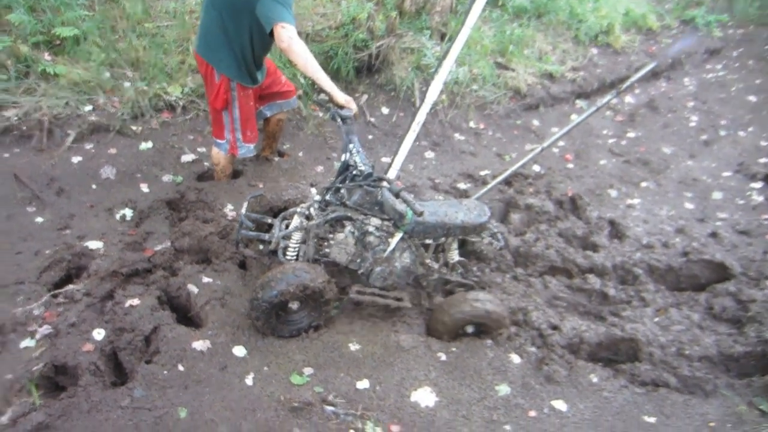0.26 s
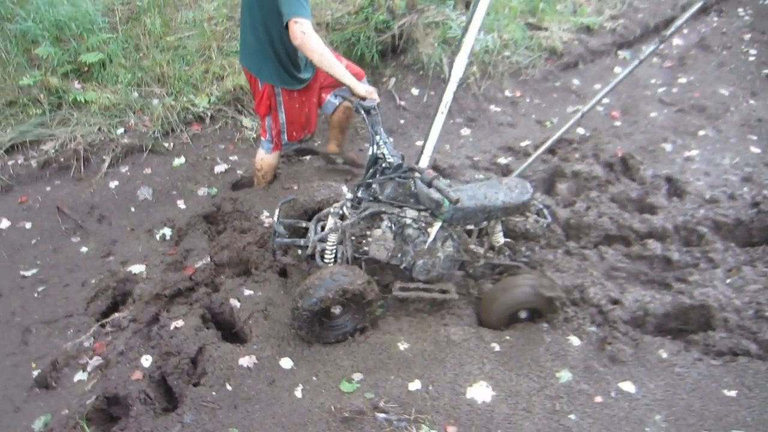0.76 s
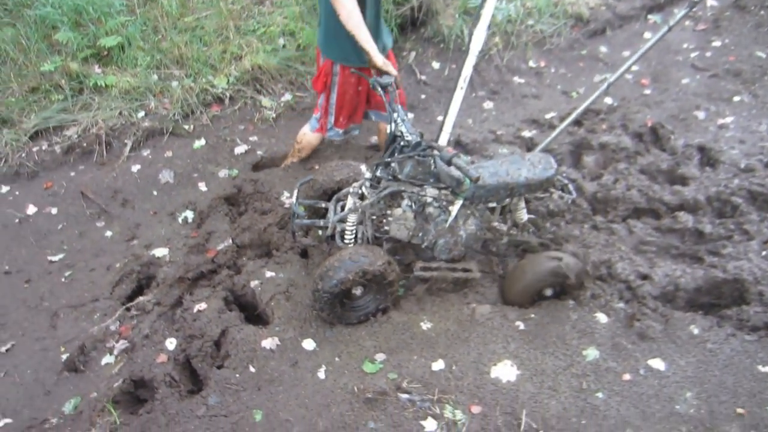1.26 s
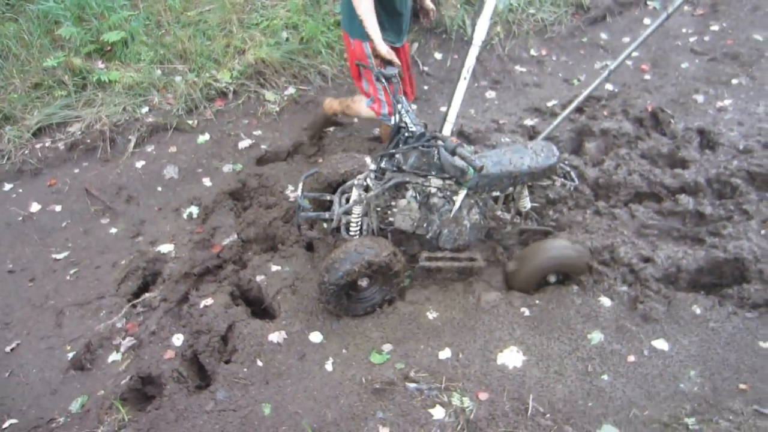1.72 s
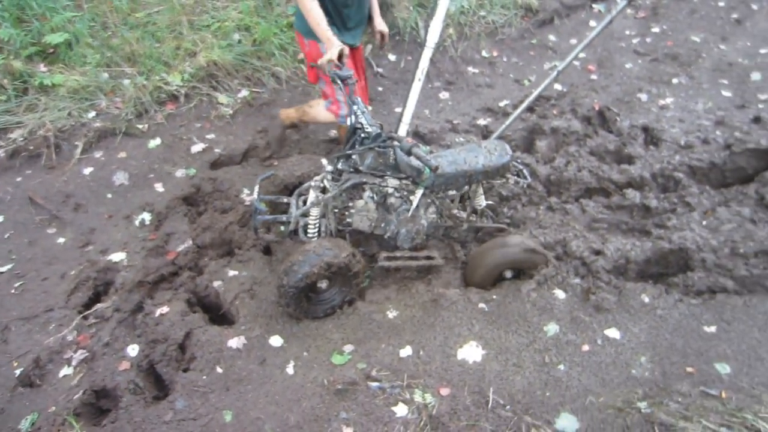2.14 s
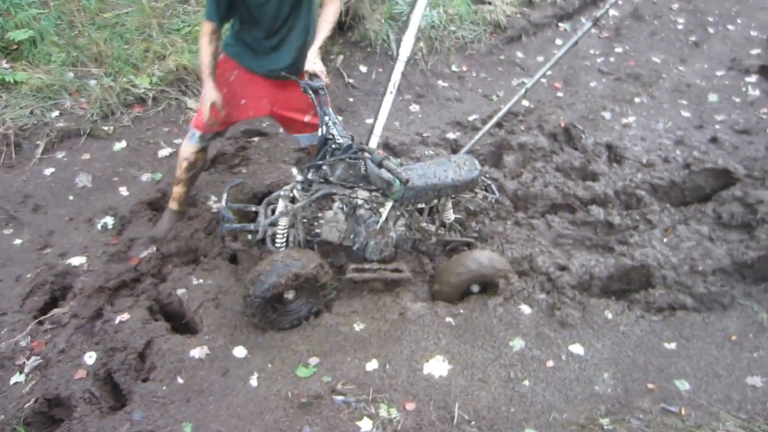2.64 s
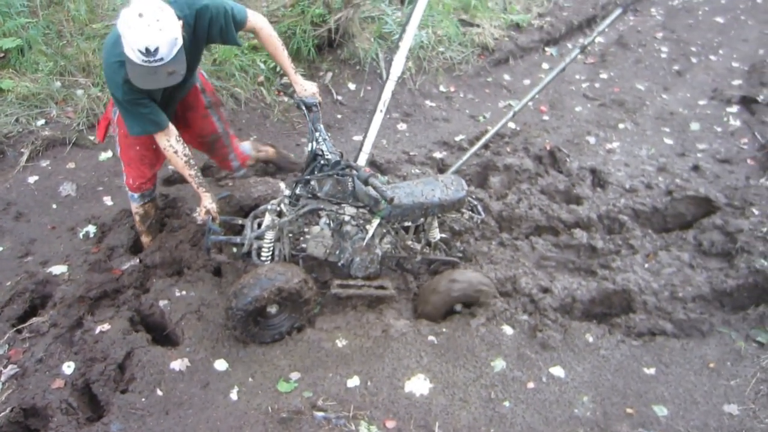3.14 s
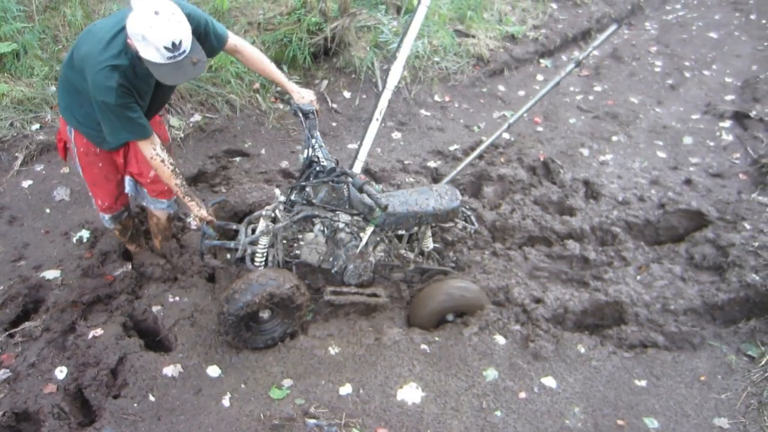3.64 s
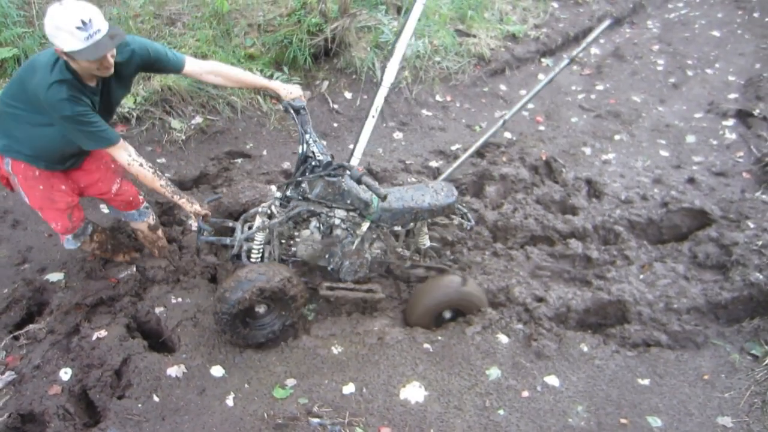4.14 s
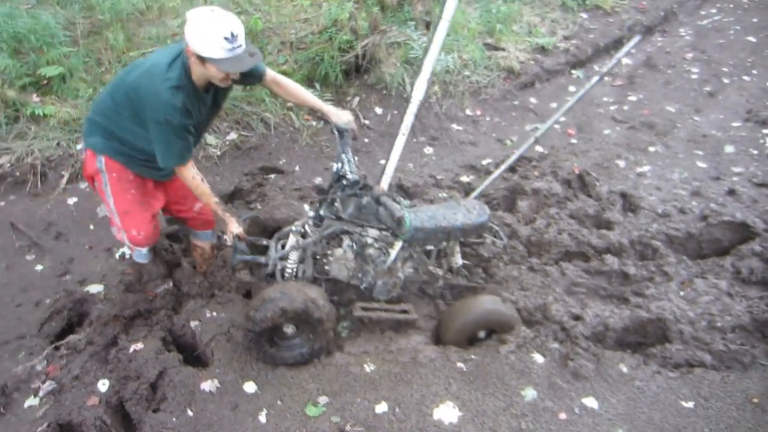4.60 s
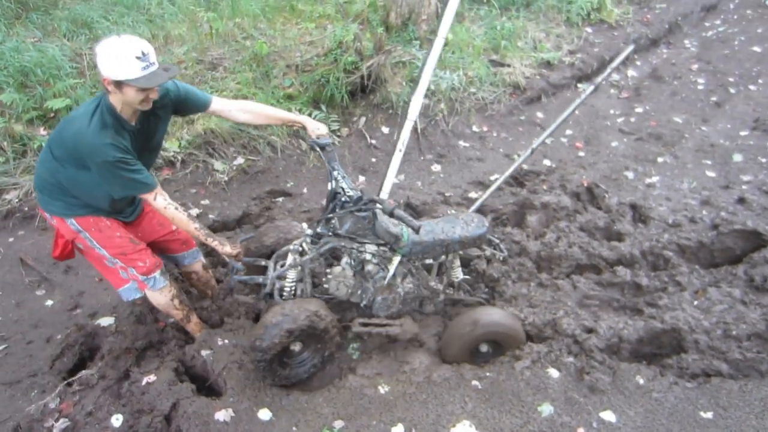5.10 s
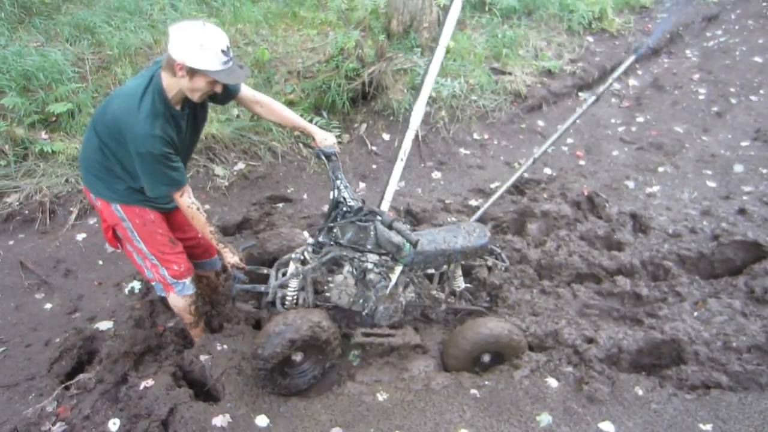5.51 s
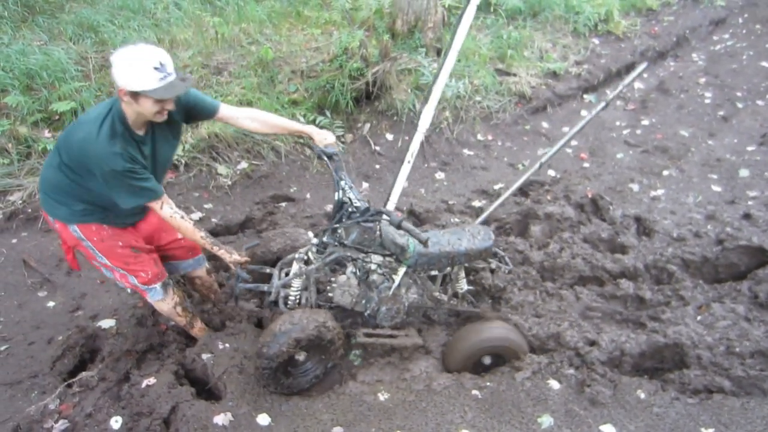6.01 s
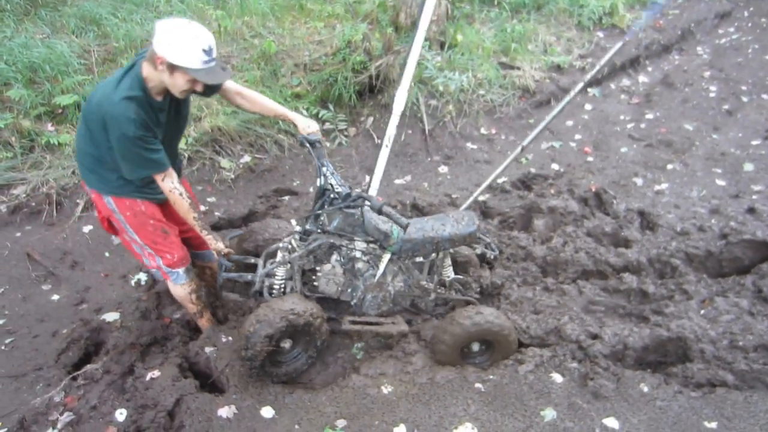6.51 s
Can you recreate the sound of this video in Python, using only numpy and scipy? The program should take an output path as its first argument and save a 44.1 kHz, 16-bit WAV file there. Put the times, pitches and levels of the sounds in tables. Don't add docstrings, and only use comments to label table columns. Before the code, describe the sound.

A small single-cylinder four-stroke quad strains in mud a few steps from the microphone. It sputters unevenly, climbs to a hard buzzing rev, crackles as the throttle lifts, then sags to hollow puffs. Separate barks rebuild into a second, faster climb, followed by two brief drops and rough pickups. Mechanical rattle and faint open air lie beneath, fairly dry, with close reflections off wet ground.

```python
import sys
import numpy as np
from scipy import signal
from scipy.fft import rfft, irfft
from scipy.io import wavfile
from scipy.ndimage import uniform_filter1d

SR = 44100
rng = np.random.default_rng(int(sys.argv[2]) if len(sys.argv) > 2 else 0)


def rack_gain(trim_db):
    fader = np.asarray(trim_db, float)
    return 10 ** (fader / 20)


def inscribe(sig):
    pcm = np.round(np.clip(np.atleast_2d(sig).T, -1, 1) * 32767)
    wavfile.write(sys.argv[1], SR, pcm.astype(np.int16))


N = 297675
TIME = np.arange(N) / SR
LEAD_S = 44 / SR


def evened(x):
    return x / np.sqrt(np.mean(x ** 2) + 1e-20)


def read(points, hz):
    f, value = np.transpose(points)
    return np.interp(np.log(hz + 1), np.log(f + 1), value)


def coloured(x, points):
    log_gain = np.log(rack_gain(read(points, abs(np.fft.fftfreq(4096, 1 / SR)))))
    taps = np.fft.ifft(np.exp(signal.hilbert(log_gain).conj())).real[:2048]
    return signal.oaconvolve(np.atleast_2d(x), taps[None], axes=1)[:, :N]


# (frequency [Hz], correlation [0-1])
LIKENESS = [(60, 1), (240, 1), (950, 0.85), (3770, 1), (8000, 1), (15000, .6)]


def noise(points):
    a, b = rng.standard_normal((2, N))
    same = np.clip(read(LIKENESS, np.fft.rfftfreq(N, 1 / SR)), 0, 1)
    right = irfft(same * rfft(a) + np.sqrt(1 - same ** 2) * rfft(b), N)
    return evened(coloured(np.array([a, right]), points))


def clicks(s, size):
    return np.bincount(np.round(s * SR).astype(int), size, N + SR)[:N]


def spread(x, shape):
    return signal.oaconvolve(x, shape)[:N]


def ring(x, hz, width):
    t = np.arange(4096) / SR
    return spread(x, np.sin(2 * np.pi * hz * t) * np.exp(-np.pi * width * t))


def gliding_ring(x, hz, width):
    turn = np.exp(2j * np.pi * np.cumsum(hz) / SR)
    return (turn * signal.lfilter([1], [1, -np.exp(-np.pi * width / SR)], x / turn)).imag


def blow(rise_ms, rebound, rebound_ms):
    ms = np.arange(-44, 400) / SR * 1000
    after = np.maximum(ms, 0) / rebound_ms
    swing_back = rebound * np.e * after * np.exp(-after)
    return swing_back - (1 + rebound / 2) * np.exp(-(ms / rise_ms) ** 2)


# (start [s], end [s])
SHUT = [
    (5.05, 5.427),
    (6.12, 6.567),
]


def shut_for(s):
    return sum((s - a) * (s > a) * (s < b) for a, b in SHUT)


LIFTS = (1.288, 4.51)
# (time [s], engine cycles so far, speed [firings/s])
CRANK = [(0.0, 0.26, 28.15), (0.44, 10.066, 24.61), (0.8, 19.181, 29.66), (1.26, 36.306, 46.5),
         (1.56, 48.024, 33.82), (1.76, 55.31, 39.14), (2.66, 79.824, 20.31), (2.84, 84.021, 22.12),
         (3.12, 90.232, 20.17), (3.44, 97.789, 22.85), (4.04, 115.903, 35.38), (4.48, 135.079, 49.3),
         (4.8, 148.19, 32.39), (5.36, 162.668, 17.66), (5.8, 172.705, 25.65), (6.08, 180.651, 31.03),
         (6.6, 193.573, 19.31), (6.75, 197.129, 24.99)]


def crank():
    s, cycles, rate = np.transpose(CRANK)
    k = np.minimum(np.searchsorted(s, TIME, "right") - 1, len(s) - 2)
    span = s[k + 1] - s[k]
    u = (TIME - s[k]) / span
    mean = (cycles[k + 1] - cycles[k]) / span
    curve = 3 * mean - 2 * rate[k] - rate[k + 1]
    twist = rate[k] + rate[k + 1] - 2 * mean
    turns = cycles[k] + span * u * (rate[k] + u * (curve + u * twist))
    fired = TIME[1:][np.diff(np.floor(turns)) > 0]
    late = sum(.002 * (fired > s) * np.exp(-abs(fired - s)) for s in LIFTS)
    return turns, np.gradient(turns) * SR, fired + late


def starved_db(speed):
    return -.5 * np.maximum(speed - 35.1, 0)


# (first firing [s], last firing [s])
RUNS = [(.02, .25), (.109, .109), (.298, .298), (.349, .349), (.396, .827), (.86, .952), (.98, 1.254),
        (1.276, 1.395), (1.421, 1.531), (1.56, 1.753), (1.779, 1.861), (2.077, 2.111), (2.713, 2.796),
        (2.884, 2.928), (3.202, 3.607), (3.642, 3.677), (3.711, 3.838), (3.868, 3.986), (4.015, 4.07),
        (4.097, 4.266), (4.289, 4.479), (4.5, 4.635), (4.923, 4.957), (5.027, 5.027), (5.431, 5.612),
        (5.654, 5.887), (5.923, 5.993), (6.026, 6.092), (6.571, 6.665), (6.706, 6.745)]
# (blow level [dB], edge relative to the blow [dB], pipe tone level [dB])
PULLS = [(-30.5, -21, -24.5), (-17, -9.5, -12), (-41, 3, -30), (-21.5, -8.5, 0), (-12.5, -12.5, -50),
         (-15.5, -12, -48), (-14.5, -9, -36), (-16.5, -17, -13), (-18.5, -24, -15), (-15.5, -10.5, -43),
         (-20, -19, -24), (-26.5, -23, -8), (-15, -13, -12), (-19, -9.5, -6.5), (-13.5, -12.5, -16),
         (-13, -13.5, -48), (-15, -15, -39), (-21, -19, -14), (-13.5, -9.5, -41), (-15, -9.5, -18),
         (-13, -9.5, -17), (-14.5, -11.5, -17), (-15, -17, -48), (-20, -15, -44), (-26, -12.5, -11.5),
         (-16, -12.5, -28), (-14, -13.5, -51), (-17, -17.5, -17), (-23, -11, -16), (-16, -14, -47)]
# (time [s], extra blow level [dB])
UNEVEN = [(.349, -2), (.396, 2), (.478, -1.5), (1.163, 0.5), (1.276, 1), (1.3, 1), (1.346, -1),
          (1.37, -2.5), (1.396, -3.5), (1.503, -6.5), (1.531, 0), (1.59, 1.5), (1.701, 1), (1.806, -5),
          (1.861, -1), (3.365, -4), (3.53, 3), (3.986, 4.5), (4.043, 3), (4.522, -3), (4.544, 1),
          (4.634, -1.5), (5.481, 0.5), (5.571, -4), (5.654, -3), (5.694, -2), (5.812, 0.5), (5.887, 1),
          (6.622, 2.5), (6.665, 1)]


def charge(fired, speed):
    shut = shut_for(fired)
    blow_db = -34 + 0.3 * (speed - 25) - 47 * shut
    edge_db = -24.5 - 0.49 * (speed - 25) + 47 * shut
    pipe_db = -12.5 - 0.67 * (speed - 25) - 46 * (shut > 0)
    for (first, last), (db, below_db, tone_db) in zip(RUNS, PULLS):
        on = (fired > first - .01) & (fired < last + .01)
        warming_db = -1.5 * (fired - (first + last) / 2)
        blow_db = np.where(on, db + starved_db(speed) + warming_db, blow_db)
        edge_db = np.where(on, below_db, edge_db)
        pipe_db = np.where(on, tone_db, pipe_db)
    blow_db = blow_db + sum(db * (abs(fired - s) < .01) for s, db in UNEVEN)
    return blow_db, edge_db, pipe_db


def load(fired, blow_db, speed):
    full = np.clip((blow_db - starved_db(speed) + 31.5) / 25, 0, 1)
    held = full[np.maximum(np.searchsorted(fired, TIME) - 1, 0)]
    keep = np.exp(-1 / (.03 * SR))
    return np.maximum(held, signal.lfilter([1 - keep], [1, -keep], held))


def outdoor_air():
    return rack_gain(-55.0) * noise([(20, -27.0), (35, -14.0), (55, 0.), (100, -8.5), (170, -7.0), (240, -47.0)])


def thicket(x):
    t = np.arange(9000) / SR
    sparse = rng.random((2, 9000)) < .05
    taps = rng.standard_normal((2, 9000)) * sparse * rack_gain(-60 * t / .2) * (t > .008)
    taps = signal.lfilter([1, -1.5, .55], [1], taps)
    return signal.oaconvolve(x, taps / np.linalg.norm(taps[0]), axes=1)[:, :N]


GROUND_MS = 3.5


def off_mud(x):
    late = np.r_[np.zeros(round(GROUND_MS / 1000 * SR)), rack_gain(-4.)]
    return signal.lfilter(.4 * late, [1, -.6], x)


# (time [s], level [dB], pitch [Hz])
SNAPS = [
    (3.184, -30, 1480),
    (5.415, -32, 1560),
    (5.468, -43, 1590),
    (6.555, -33, 1610),
    (6.607, -33, 1500),
    (6.651, -31, 1600),
]


def snaps():
    t = np.arange(700) / SR
    shape = np.minimum(t / .002, 1) * np.exp(-t / 0.008)
    return sum(spread(clicks(np.array([s]), rack_gain([db])), shape * np.sin(2 * np.pi * hz * t * (1 - 3.6 * t)))
               for s, db, hz in SNAPS)


def tappets(turns):
    s = TIME[1:][np.diff(np.floor(2 * turns)) > 0]
    size = rack_gain(-44.5 + 3.6 * rng.standard_normal(len(s)) - 23.0 * shut_for(s))
    burst = spread(clicks(s, size), np.exp(-np.arange(400) / SR / 0.002))
    return burst * evened(ring(rng.standard_normal(N), 6060, 2800.0))


def throb(turns, speed, driven):
    shut = shut_for(TIME)
    driven = uniform_filter1d(driven, size=4000)
    pulse = np.cos(4 * np.pi * turns) * rack_gain(-22. * shut)
    pulse = pulse + 1.9 * (speed / 50) ** 4 * driven * np.cos(2 * np.pi * turns)
    pulse = pulse + 0.17 * (25 / speed) ** 3 * np.cos(8 * np.pi * turns)
    loaded = pulse * rack_gain(-44.5 - 0.44 * (speed - 21) + 10.5 * driven)
    return loaded + np.sin(6 * np.pi * turns) * rack_gain(-61.5 - 1.7 * (speed - 19) + 9. * shut)


# (frequency [Hz], density [dB/Hz])
CLATTER = [(300, -40.5), (700, 5.5), (1100, -4), (2000, -9.5), (3000, -18), (6300, -31.5), (9000, -35),
           (12000, -43), (15000, -45)]
# (frequency [Hz], density [dB/Hz])
RUMBLE = [(65, -46), (110, -18), (151, -6), (270, -6.5), (311, -12.5), (387, -9.5), (503, -21.5),
          (796, -27.5), (1500, -23.5), (1950, -68), (3300, -120)]
# (frequency [Hz], density [dB/Hz])
WHIRR = [(900, -22), (1800, -1), (2500, -8), (3500, -13), (5000, -15), (6300, -20), (9000, -18.5),
         (11500, -35)]


def engine(turns, speed, driven):
    shut = shut_for(TIME)
    beat = 1 + 0.068 * np.cos(2 * np.pi * (turns - .12)) + 0.5 * np.cos(4 * np.pi * (turns - .2))
    knocks = (rng.random(N) < 160 / SR) * rack_gain(5.8 * np.minimum(rng.exponential(1, N), 3.))
    knocks = spread(knocks, np.exp(-np.arange(600) / SR / 0.0035))
    clatter_db = -46 + 0.4376 * (np.minimum(speed, 38.) - 25) + 12.5 * driven - 27 * shut
    clatter_db = clatter_db - .3 * np.maximum(speed - 38, 0)
    rattle = evened(noise(CLATTER) * (beat + knocks)) * rack_gain(clatter_db)
    rumble = noise(RUMBLE) * beat * rack_gain(-44.0)
    whirr = noise(WHIRR) * beat * rack_gain(-51.5 + 0.04 * (speed - 24.0) - 36.0 * shut)
    return rattle + rumble + whirr


# (time [s], level [dB], pitch [Hz])
THUDS = [
    (.002, -21, 268),
    (.013, -30, 270),
    (0.299, -14, 258),
    (0.3102, -16, 257),
    (.003, -21.5, 700),
    (.043, -41, 577),
    (.087, -25, 790),
    (.22, -18, 640),
    (2.312, -22.5, 605),
    (2.322, -25, 570),
]


def thuds():
    return sum(ring(clicks(np.array([s]), rack_gain([db])), hz, 0.13 * hz) for s, db, hz in THUDS)


# (time [s], extra level [dB])
PUFFS = [(.027, -1), (.066, -5), (.153, 14), (.2, 11), (.25, 5), (1.9, 3), (1.93, -1), (1.955, 4),
         (1.982, 5.5), (2.012, 8), (2.044, 6), (2.146, 6), (2.183, 4), (2.221, 6.5), (2.261, 5.5),
         (2.302, 0), (2.343, 2), (2.387, -1), (2.432, 2.5), (2.477, -0.5), (2.524, -1), (2.572, -1),
         (2.62, 0), (2.667, 2), (2.84, -5), (2.97, 4), (3.016, 3.5), (3.062, 4.5), (3.109, 2.5),
         (3.157, 5.5), (4.66, 5), (4.71, 9), (4.735, -7), (4.765, 7), (4.8, 8), (4.83, -11), (4.858, 7),
         (4.89, 1), (5.1, -4), (5.145, 0), (5.195, -4), (5.24, -3), (5.29, 0.5), (5.37, 1)]


def pipe_tone(fired, pipe_db, speed):
    pipe_db = pipe_db + sum(db * (abs(fired - s) < .012) for s, db in PUFFS)
    size = rack_gain(pipe_db - 16.5) * rack_gain(.5 * rng.standard_normal(len(fired)))
    back = clicks(fired + .011, size)
    puffs = clicks(fired + 0.00028, size) + 0.85 * back
    puffs = spread(puffs, np.hanning(40) / 20)
    wander = evened(uniform_filter1d(uniform_filter1d(rng.standard_normal(N), size=3000), size=3000))
    hz = (283.6 + 0.14 * (speed - 25)) * (1 + .012 * wander)
    tone = gliding_ring(puffs, hz, 16)
    tone = tone + rack_gain(-6.0) * gliding_ring(back + 0.18 * puffs, 1.8 * hz, 25.0)
    for db, ratio, width in [(-8.5, 0.624, 17.3), (-6.5, 1.18, 67.0), (-1.5, 2.153, 45.0)]:
        tone = tone + rack_gain(db) * gliding_ring(puffs, ratio * hz, width)
    draught = rng.standard_normal(N)
    hum = sum(rack_gain(db) * evened(gliding_ring(draught, ratio * hz, width))
              for db, ratio, width in [(0, 1, 18.0), (-6.5, 0.608, 26.0), (-3.5, 1.6, 30.)])
    return tone + hum * rack_gain(-40.5 - 30 * shut_for(TIME))


def gas_pace(speed):
    return np.maximum(1.016 - .006 * (speed - 24), .969)


# (delay [ms], level [dB])
PIPE = [
    (11.8, -10.),
    (17.2, -9.6),
    (22.1, -21.),
    (29., -19.),
    (34.4, -20.),
]


def pipe_trips(fired, speed, blow_db):
    loss_db = np.clip(-.45 * (blow_db + 11.5), -2, 6)
    loss_db = loss_db - .5 * np.maximum(speed - 32, 0)
    swallowed_db = np.clip(.55 * (speed - 31), 0, 8)
    trips = [(np.maximum(fired - LEAD_S, 0), 1)]
    for k, (ms, db) in enumerate(PIPE):
        chance_db = 1.5 * np.minimum(30 / speed, 1) ** 2 * rng.standard_normal(len(fired))
        s = fired - LEAD_S + ms / 1000 * gas_pace(speed)
        trips.append((np.maximum(s, 0), rack_gain(db + chance_db + loss_db - k * swallowed_db)))
    return trips


# (delay [ms], level [dB])
OUTLET = [
    (0, 0.),
    (1.45, -12.4),
    (3.46, -.2),
    (4.48, -6.2),
    (5.24, -6.2),
    (6.53, -15.),
    (9.64, -13.3),
]
# (resonance [Hz], width [Hz], level [dB], lag [ms])
CHAMBERS = [
    (103, 42, -9, -0.66),
    (270.2, 47, -2, 0.32),
    (673, 63, -5, 0.2),
    (171.2, 3.1, -21, 0.58),
    (599, 71, -21.5, 0.35),
]


def silencer(fired, speed, size, steep, trips, front):
    soft, sharp = (sum(clicks(s, g * size * share) for s, g in trips) for share in (1 - steep, steep))
    blows = signal.oaconvolve(soft, blow(.4, .62, .52)) + signal.oaconvolve(sharp, blow(.25, .6, .55))
    delay_ms, path_db = np.transpose(OUTLET)
    body = spread(blows, clicks(delay_ms / 1000, rack_gain(path_db))[:1024])
    struck = size * rack_gain(-0.1 * (speed + 10.5))
    for hz, width, db, ms in CHAMBERS:
        body = body + rack_gain(db) * ring(clicks(fired + ms / 1000, struck), hz, width)
    sung = front * rack_gain(-11.5 + .9 * (speed - 45))
    return body - ring(clicks(fired + .01105, sung) + clicks(fired + .00105, .3 * sung), 760., 60.)


# (time [s], level [dB])
AFTERFIRE = [(1.3063, -20), (1.3352, -8.5), (1.3589, -8), (1.383, -7.5), (1.4015, -15), (1.4079, -18),
             (1.4339, -24), (1.7641, -23), (1.9329, -25), (2.767, -10), (2.94, -15), (3.255, -9),
             (4.4923, -19), (4.5126, -14), (4.535, -8), (4.556, -17), (4.578, -14), (4.6, -18),
             (4.6237, -14), (4.6478, -8), (4.975, -24), (5.444, -23), (5.492, -24), (5.538, -24.5),
             (5.58, -25), (5.665, -16), (6.583, -24), (6.633, -17), (6.6765, -14)]
# (delay [ms], level at 40 firings/s [dB], slope [dB per firing/s])
BAFFLES = [
    (1.36, -6., 0.),
    (2.75, -14., .1),
    (4.35, -19., .1),
    (5.2, -20., 0.1),
    (5.95, -19., 1.),
    (6.3, -19., .7),
    (11.45, -21., .2),
    (14.3, -19., .6),
    (17.4, -23., .5),
]


def shock_front(fired, speed, front, steep, trips):
    fronts = sum(clicks(s, g ** (.7 + .2 * steep) * front) for s, g in trips[:3])
    for ms, db, slope in BAFFLES:
        fronts = fronts + clicks(fired - LEAD_S + ms / 1000, front * rack_gain(db + slope * (speed - 40)))
    late_s, late_db = np.transpose(AFTERFIRE)
    cracks = spread(clicks(late_s - LEAD_S, rack_gain(late_db)), blow(0.061, 0.33, 0.23))
    shock = spread(fronts, blow(0.096, 0.17, 0.043)) + cracks
    tip = clicks(fired, front) + clicks(late_s, rack_gain(late_db - 14.0))
    tip = tip + clicks(fired + GROUND_MS / 1000, 0.36 * front)
    return shock + rack_gain(-2.5) * ring(tip, 947.0, 316.0)


# (frequency [Hz], density [dB/Hz])
JET = [(300, 6), (800, 4), (2000, -2.5), (4500, -9.5), (7500, -10.5), (10000, -17), (12000, -34),
       (15000, -33)]


def gas_jet(fired, speed, size, edge_db, steep):
    t = np.arange(3000) / SR
    gust = np.exp(-t / 0.0017) + 0.19 * np.exp(-t / 0.018)
    chance_db = .5 * rng.standard_normal(len(fired))
    jet_size = size * rack_gain(edge_db + 6.0 + chance_db - 0.073 * np.maximum(speed - 36, 0)) * (1 - 0.29 * steep)
    late_s, late_db = np.transpose(AFTERFIRE)
    gusts = clicks(fired, jet_size) + 0.071 * clicks(fired + 0.016 * gas_pace(speed), jet_size)
    gusts = gusts + clicks(late_s, rack_gain(late_db - 15.5))
    hiss = noise(JET)
    low = signal.sosfilt(signal.butter(1, 1500, fs=SR, output="sos"), hiss)
    hiss = hiss - np.clip((np.interp(TIME, fired, speed) - 33) / 14, 0, .7) * low
    return spread(gusts, gust) * hiss


# (time [s], extra edge level [dB])
EDGES = [(.396, 2.5), (.437, 1), (.478, 0), (.52, -2), (.562, 1.5), (.604, 2), (.644, 0), (.684, -0.8),
         (.722, -1.5), (.759, 2), (.793, 5), (.827, 2), (.89, -4), (.922, -1.5), (.98, -2), (1.008, 2.5),
         (1.036, -4), (1.56, -0.5), (1.59, 2.5), (1.62, 2), (1.647, 3.5), (2.713, 1), (2.755, 3),
         (2.884, 1.5), (2.928, -1), (3.202, 2), (3.243, 2.5), (3.283, -0.5), (3.323, 0), (3.365, 2),
         (3.407, 1), (3.449, 1), (3.491, 1.5), (3.53, -0.5), (3.569, -2.5), (3.607, -3), (3.642, 2.5),
         (3.677, 8), (3.711, 2), (3.743, -2.5), (3.807, 2.5), (3.838, 3), (4.015, 0.5), (4.043, -2),
         (4.070, 0.8), (4.438, 3), (4.458, 2.5), (4.478, 2), (4.957, 9), (5.654, 1), (5.694, 2),
         (5.734, 0.5), (5.773, 0), (5.812, -1), (5.85, -1), (5.887, -1.5), (5.957, 1.5), (5.993, 6.5),
         (1.275, 2), (1.299, -1), (1.322, -5), (1.395, -13), (1.421, 7), (1.475, 6), (1.503, -12),
          (4.499, -0.5), (4.522, 1), (4.543, 0.5), (4.565, 3.5), (4.587, 1), (4.611, -8), (4.634, -8)]


def exhaust(fired, speed, blow_db, edge_db):
    edge_db = edge_db + sum(db * (abs(fired - s) < .01) for s, db in EDGES)
    chance, edge_chance = rng.standard_normal((2, len(fired)))
    size = rack_gain(blow_db + 4.5 + .5 * chance)
    wobble = rack_gain(.7 * np.minimum(30 / speed, 1) ** 2 * edge_chance)
    steep = np.clip((speed - 23.5) / 6.4, 0, 1)
    front = size * steep * rack_gain(edge_db + 14.5 + 0.16 * (speed - 59.0)) * wobble
    trips = pipe_trips(fired, speed, blow_db)
    body = silencer(fired, speed, size, steep, trips, front)
    shock = shock_front(fired, speed, front, steep, trips)
    jet = gas_jet(fired, speed, size, edge_db, steep)
    return body + 0.37 * jet, shock + 0.77 * jet


def scene():
    turns, speed, fired = crank()
    pace = np.interp(fired, TIME, speed)
    blow_db, edge_db, pipe_db = charge(fired, pace)
    driven = load(fired, blow_db, pace)
    body, bright = exhaust(fired, pace, blow_db, edge_db)
    bright = bright + tappets(turns)
    machine = body + pipe_tone(fired, pipe_db, speed) + thuds() + bright + off_mud(bright) + snaps()
    machine = machine + rack_gain(2.0) * engine(turns, speed, driven)
    hz = np.fft.rfftfreq(N, 1 / SR)
    machine = irfft(rfft(machine) * hz ** 4 / (hz ** 4 + 135. ** 4), N)
    bass = irfft(rfft(machine) / (1 + (hz / 184.0) ** 6), N)
    climbing = uniform_filter1d(sum(1. * (TIME > s - .7) * (TIME < s) for s in LIFTS), size=600)
    racing = np.clip((speed - 33.) / 13., 0, .96) * climbing
    machine = machine - racing * bass
    pulse = throb(turns, speed, driven) * rack_gain(3.3 * racing ** 2)
    return machine + pulse + outdoor_air() + rack_gain(-14.0) * thicket(machine)


def band_limit(x):
    return signal.sosfilt(signal.butter(12, 16630, fs=SR, output="sos"), x)


# (frequency [Hz], gain [dB])
MICROPHONE = [(3000, -0.5), (7000, -1), (9500, -6.5), (12000, -14), (13500, -12), (15500, -5), (16400, -43)]
# (frequency [Hz], left minus right [dB])
BALANCE = [(60, 2.5), (240, 2.0), (950, 1.0), (3770, -0.5), (15000, -0.5)]


def record(dry):
    hz = np.fft.rfftfreq(N + 4096, 1 / SR)
    lean = rack_gain(read(BALANCE, hz) / 2) * np.exp(-2j * np.pi * hz * 0.42 / SR)
    ports = rfft(coloured(dry, MICROPHONE), N + 4096) * np.array([lean, 1 / lean])
    ports = np.clip(irfft(ports, N + 4096)[:, :N], -1, 1)
    ports = signal.sosfilt(signal.cheby2(14, 70, 16650, fs=SR, output="sos"), ports)
    return band_limit(ports)


dry = scene()
out = record(dry)
inscribe(out)
```